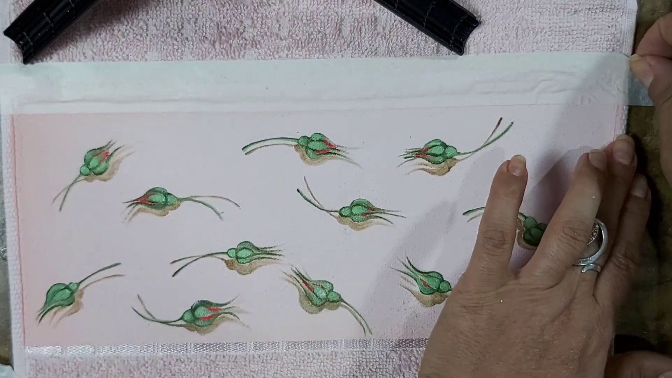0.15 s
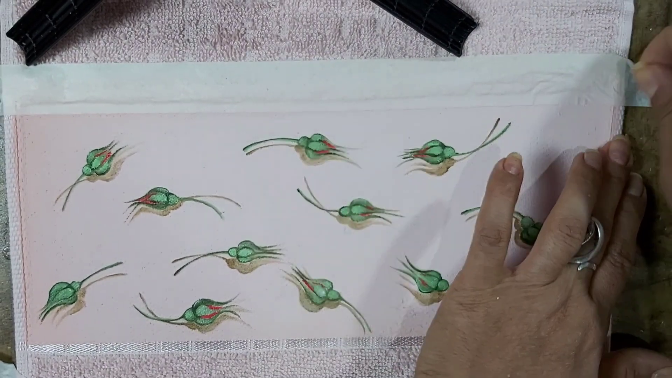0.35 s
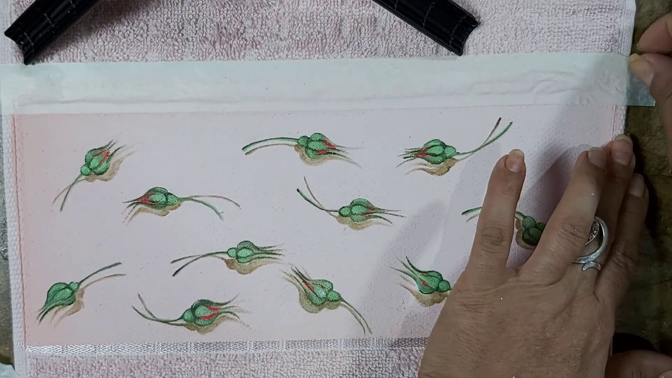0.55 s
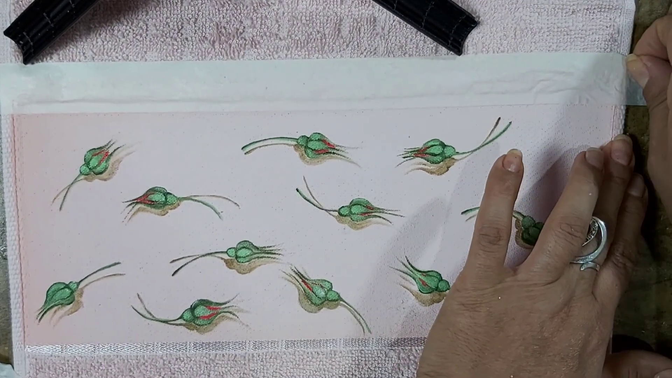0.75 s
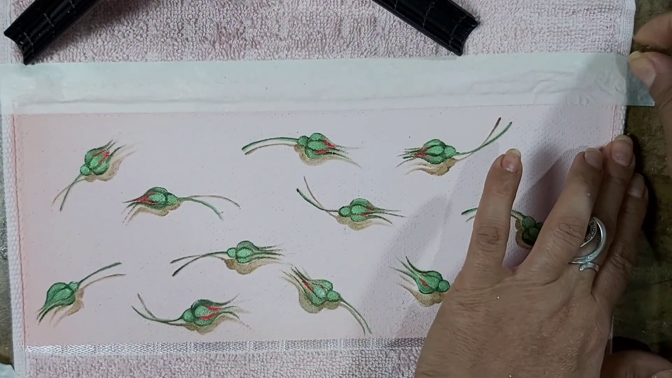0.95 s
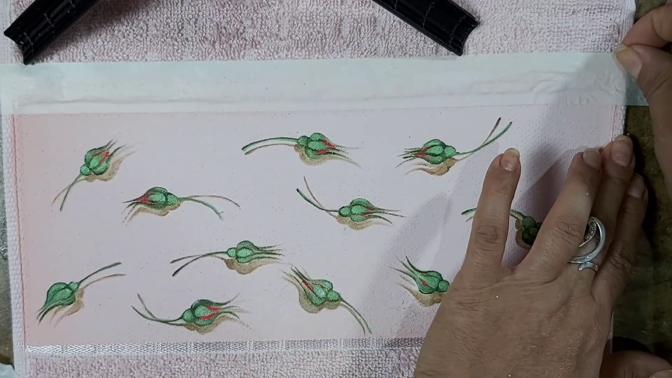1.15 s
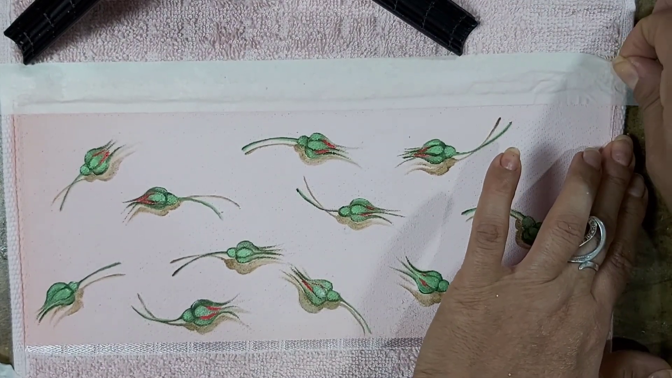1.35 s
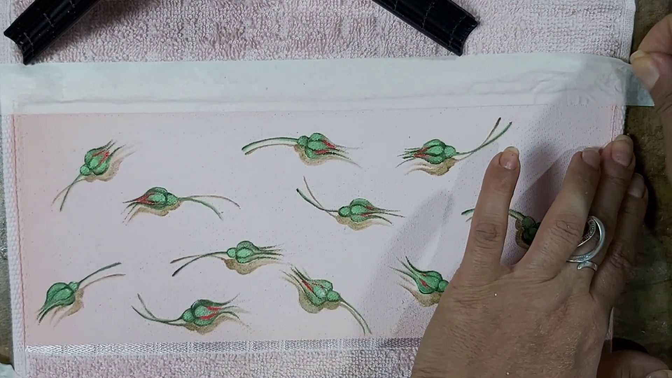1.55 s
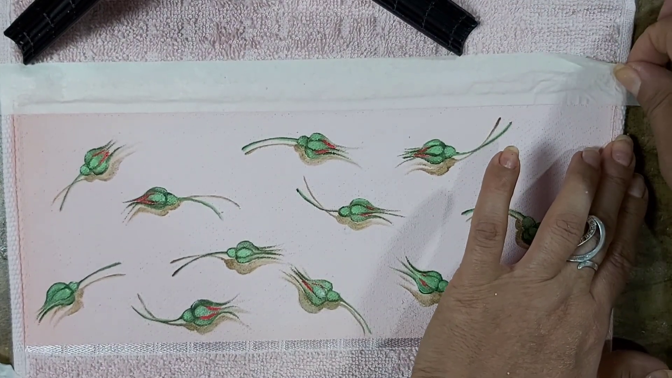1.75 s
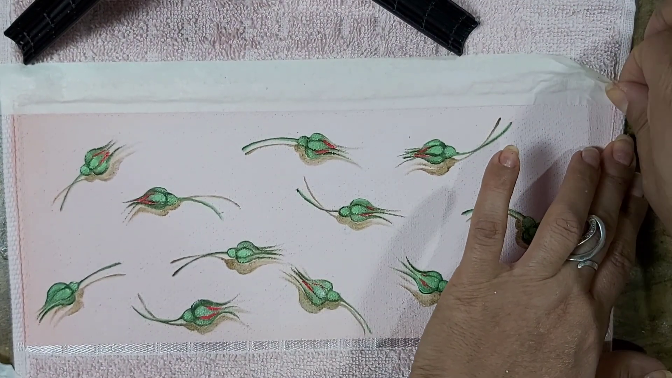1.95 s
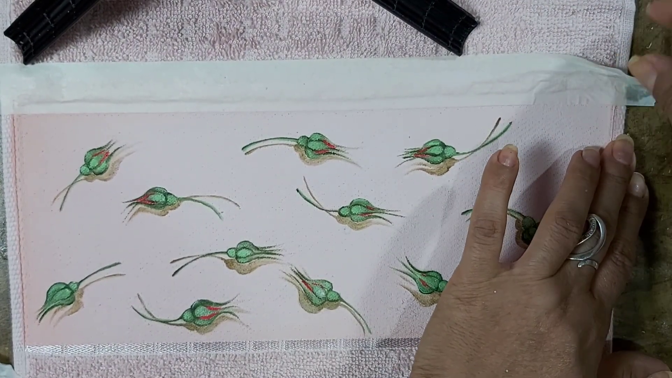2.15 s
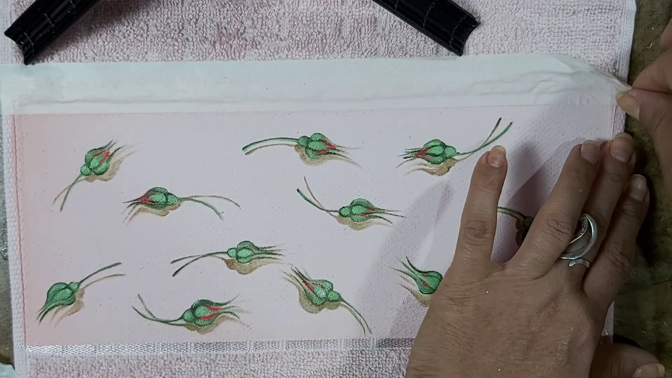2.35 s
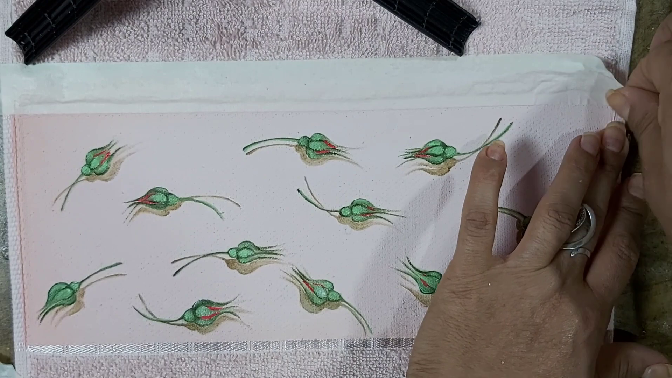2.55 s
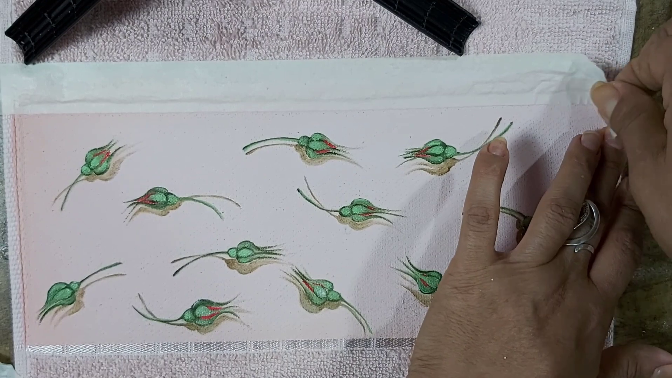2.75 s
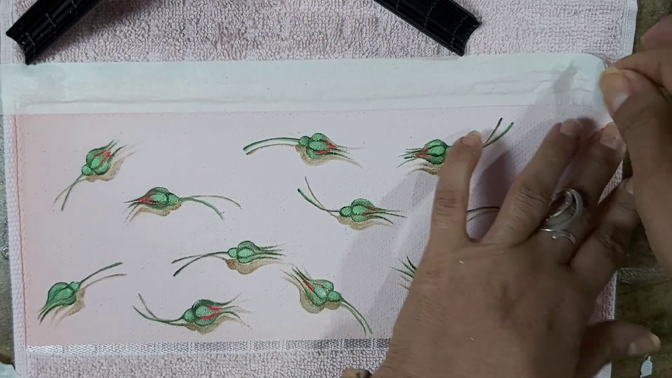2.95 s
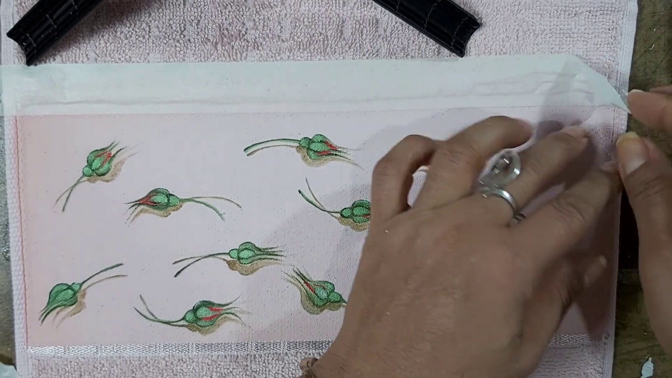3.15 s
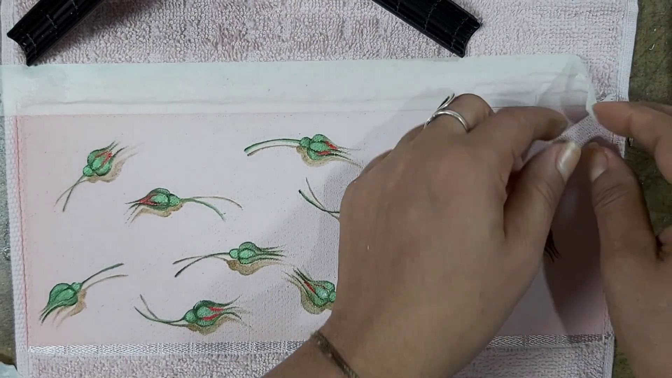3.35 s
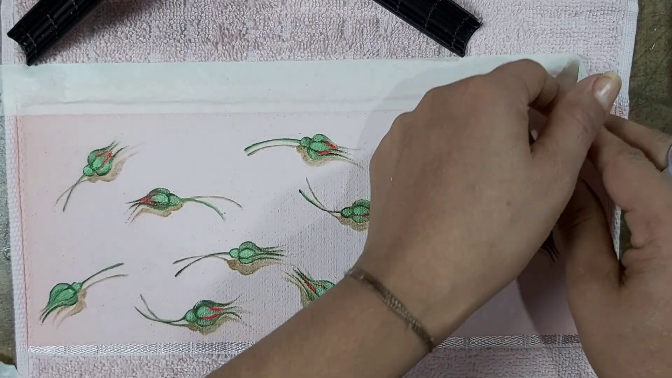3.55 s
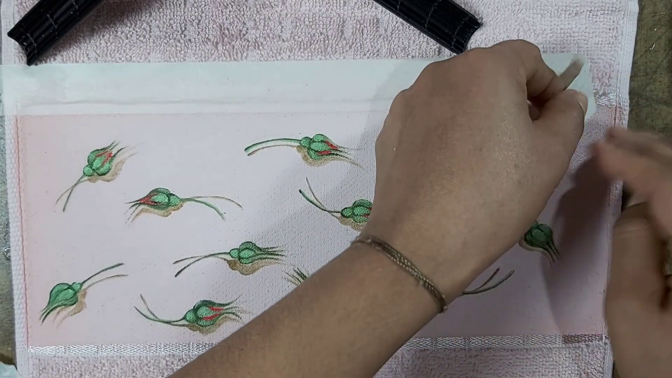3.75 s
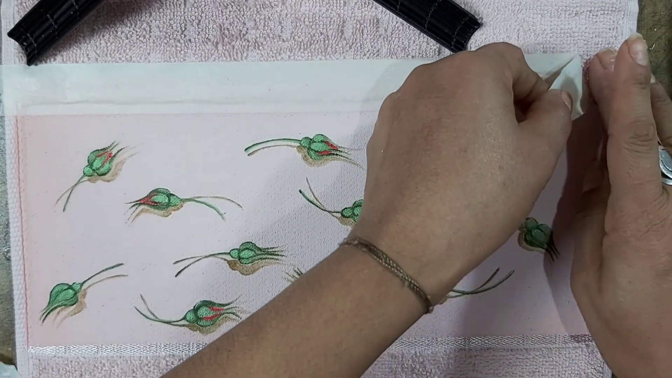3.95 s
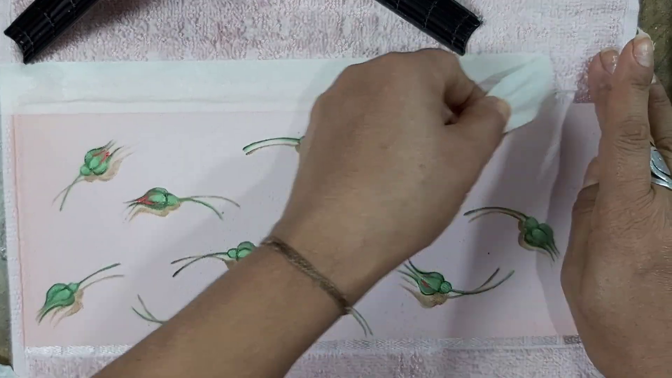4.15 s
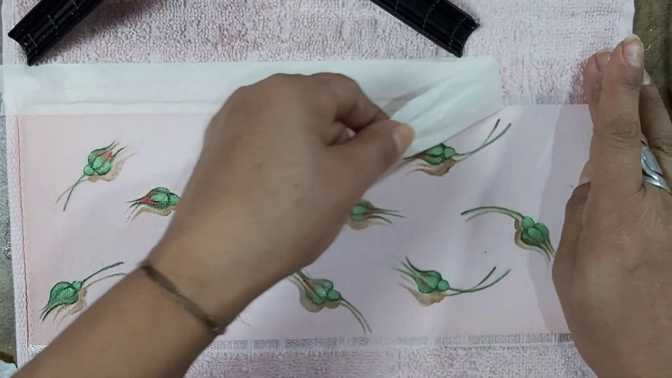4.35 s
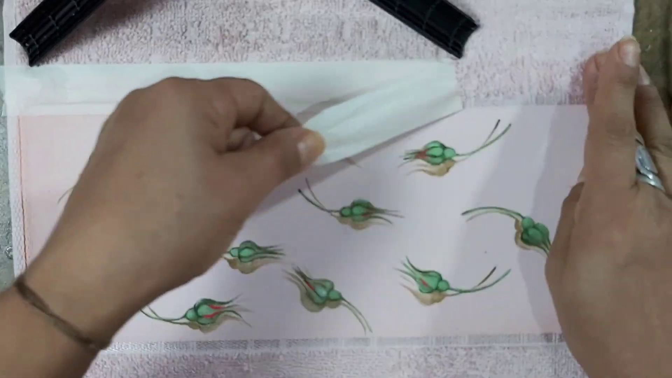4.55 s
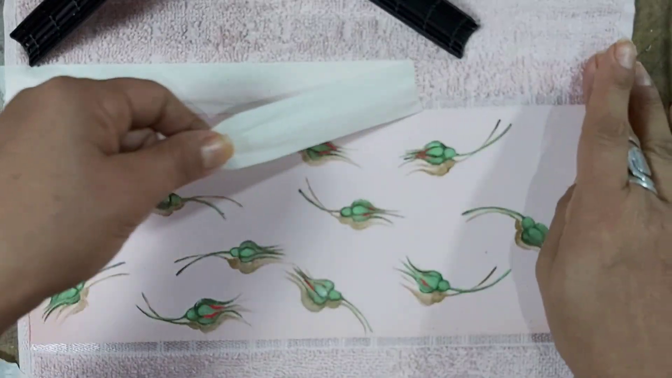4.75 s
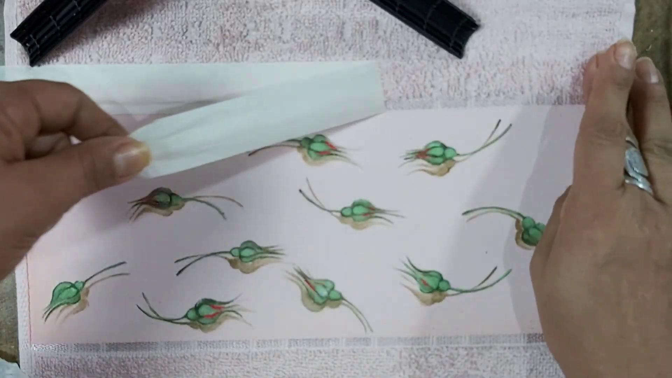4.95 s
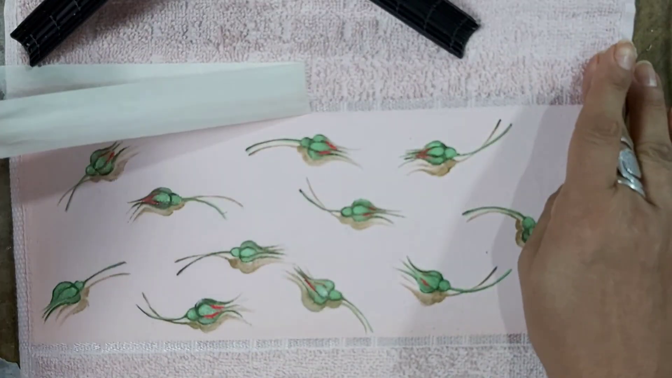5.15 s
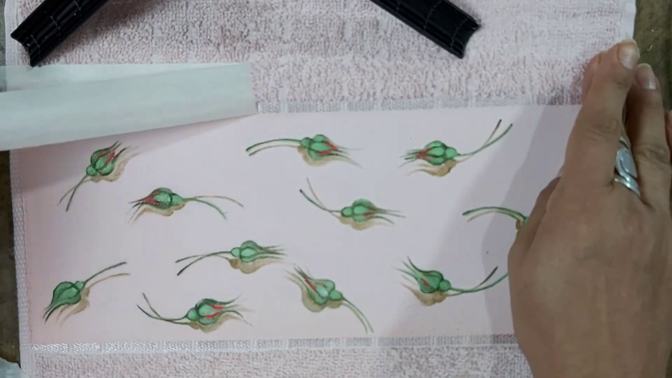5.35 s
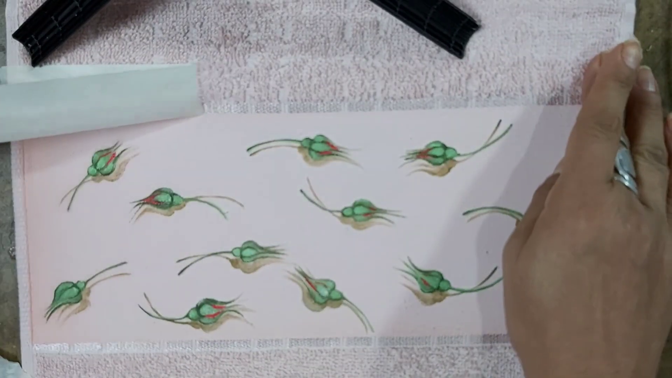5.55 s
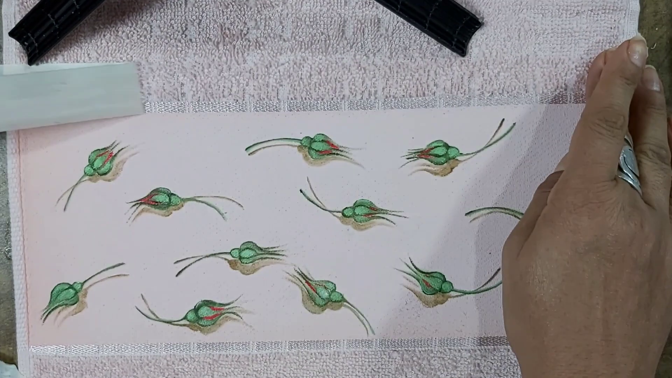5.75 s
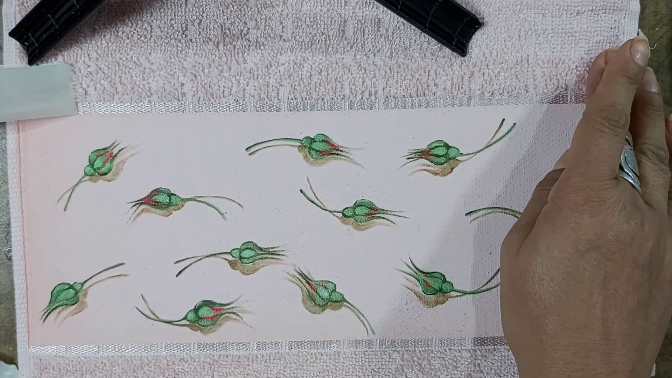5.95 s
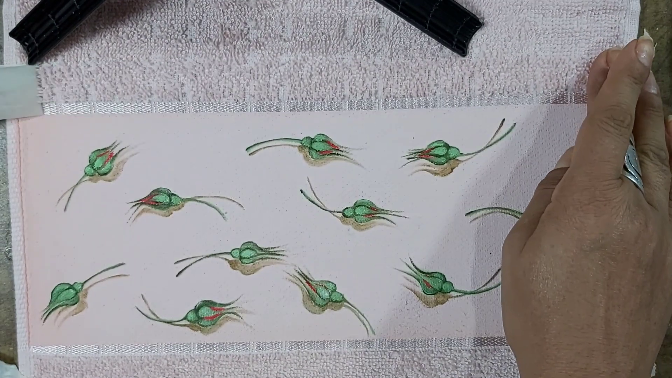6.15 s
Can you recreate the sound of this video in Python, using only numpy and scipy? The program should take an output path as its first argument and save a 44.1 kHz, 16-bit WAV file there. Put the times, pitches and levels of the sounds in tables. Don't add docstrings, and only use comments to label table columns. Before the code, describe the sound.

In a quiet room, adhesive tape crackles and snaps as a corner is lifted, then peels off fabric in a long, uneven tearing rasp.

```python
import sys
import numpy as np
from scipy import signal
from scipy.fft import rfft, irfft
from scipy.io import wavfile
from scipy.ndimage import uniform_filter1d, map_coordinates

SR = 44100
rng = np.random.default_rng(int(sys.argv[2]) if len(sys.argv) > 2 else 0)


def master(y):
    cut = np.clip(np.atleast_2d(y).T, -1, 1)
    pcm = np.round(cut * 32767)
    wavfile.write(sys.argv[1], SR, pcm.astype(np.int16))


def ratio_of_db(decibels):
    return 10 ** (np.asarray(decibels, float) / 20)


N = 272979

# time_s, left_lag_samples (delay of the left port behind the right)
PEEL_LINE = [
    (0, -11),
    (2.5, -10),
    (3.5, -10.5),
    (4.2, -4),
    (4.7, -2),
    (5.2, 2.5),
    (5.7, 5.5),
    (6.19, 5),
]


def peel():
    # time_s, finest_fibres_db (added)
    angle = [(1.9, 0), (2.3, 0), (2.45, -0.5), (2.7, 1), (3.2, 1), (3.5, -1), (3.9, 1), (4.07, -1),
             (4.36, 0.5), (4.42, -1), (5.08, 1), (5.44, -3), (5.6, -0.5), (5.69, 1.5), (6.19, 0)]
    # centre_hz, width_hz, level_db
    fibres = [(6360, 2350, -3.5), (7780, 1540, 2.5), (9260, 2090, -1.5)]
    # centre_hz, width_hz, level_db
    fine_fibres = [(11600, 1800, 1.5), (14120, 1020, -2)]
    # centre_hz, width_hz, level_db
    rustle = [(3110, 2520, -2), (4370, 670, 4.5), (5670, 2470, -2.5)]
    # centre_hz, width_hz, level_db
    strip = [(752, 49, 0), (1130, 490, 0), (1770, 400, 3.5), (2500, 950, -3)]
    # time_s, centre_hz, level_db (against the fibre clicks)
    span_ring = [
        (3.8, 11400, -16),
        (4.05, 8660, -16),
        (4.37, 11100, -6),
        (4.68, 9100, -12.5),
        (5.1, 11390, -8.5),
        (5.19, 9740, -16),
        (5.52, 8700, -13),
        (5.77, 10900, -6),
        (6.19, 9100, -11),
    ]

    click_db, fine_db, rustle_db, body_db, lean_db = pull()
    lag = curves(PEEL_LINE)[0]
    pan_db = -0.5 - 0.22 * lag + lean_db
    fine_db = fine_db + curves(angle)[0]
    rush_db = 0.74 * walk(60) + 0.66 * walk(25)
    threads = clicks(6000., 2.65)
    slips = clicks(2500., 1.32) + 0.19 * threads

    coarse_db = 10 * np.log10(np.clip(1 - ratio_of_db(2 * fine_db), .15, 1))
    coarse = steep(flex(threads, fibres, 1.27, 24), 4300, 11700)
    fine = steep(ring(threads, fine_fibres), 9060, 21300)
    paper = steep(flex(slips, rustle, 2.2, 40), 2610, 6840)
    body = steep(flex(slips, strip, 2.2, 30), 800, 3200)
    sound = level(coarse, 0) * ratio_of_db(coarse_db)
    sound += level(fine, 0) * ratio_of_db(fine_db + 1.7 * walk(40))
    sound += level(paper, 0) * ratio_of_db(rustle_db + 1.3 * walk(50))
    sound += level(body, 0) * ratio_of_db(body_db + 1.2 * walk(45))

    span_hz, span_db = curves([(3.7, 11600, -29.5)] + span_ring)
    span_width_hz = 1700
    sound += level(sweep(clicks(5000., 3.3), span_hz, span_width_hz), 0) * ratio_of_db(span_db)

    near, far = sound * ratio_of_db(click_db + rush_db - 2.0)
    far_lag = 158.7 + 30 * walk(4)
    return ports(near, pan_db, lag) + 1.18 * ports(far, pan_db, far_lag)


def pull():
    # peak_s, peak_db, rise_s, fall_s, weight (0 finest
    tugs = [(0.0, -79, .03, 0.067, 0.85), (0.098, -74, 0.12, 0.099, 0.58), (0.646, -78, .05, 0.11, 0.6),
            (0.976, -84.5, 0.15, 0.075, 0.75), (1.1, -84, 0.19, 0.056, 0.71), (1.252, -58, .13, 0.14, 0.28),
            (1.282, -57, 0.036, 0.16, 0.97), (1.6, -74.5, 0.28, 0.19, 0.24), (1.74, -49, 0.18, 0.16, 0.032),
            (1.8, -49, 0.19, 0.13, 0.29), (1.901, -59, 0.0087, 0.11, 0.78), (1.95, -75.5, .05, 0.13, 0.88),
            (2.3, -57, 0.088, 1.4, 0.077), (2.403, -43.5, 0.07, 0.19, 0.55),
            (2.463, -46.5, 0.21, 0.05, 0.54), (2.53, -55, 0.1, 0.21, 0.55), (2.6, -44, 0.089, 0.23, 0.63),
            (2.67, -50, 0.28, 0.037, 0.63), (2.76, -71, 0.34, 0.24, 0.39), (2.86, -63.5, 0.06, 0.15, 0.72),
            (3.25, -90, 0.3, 2.0, 0.9), (3.43, -64.5, 0.046, 0.41, 0.49), (3.507, -65, 0.013, 0.14, 0.91),
            (1.66, -64.5, .02, 0.27, 0.34), (2.24, -77.5, 0.47, 0.31, 0.74),
            (3.78, -63, 0.072, 0.61, 0.35), (3.881, -54.5, 0.18, 0.14, 0.46), (3.73, -96, .05, .1, 0.11),
             (3.95, -52, 0.034, 0.057, 0.2), (4.07, -46.5, 0.38, 0.4, 0.48), (4.192, -47, .01, 0.11, 0.5),
             (4.36, -43.5, 0.19, 0.054, 0.42), (5.08, -52, 0.19, .1, 0.28), (5.45, -44.5, 0.17, 0.1, 0.57),
             (5.57, -43.5, 0.13, 0.035, 0.45), (5.69, -45.5, 0.23, 0.047, 0.64), (5.97, -52, 1, 0.34, 0.12),
             (6.19, -48, 0.23, 0.11, 0.49)]
    # time_s, level_db, weight (0 to 1)
    steady = [
        (3.86, -84, 0.47),
        (3.932, -48, 0.5),
        (4.4, -47, 0.49),
        (4.72, -45.5, 0.49),
        (5.0, -42.5, 0.5),
        (5.44, -44, 0.47),
        (5.53, -47.5, 0.59),
        (6.04, -50.5, 0.58),
        (6.14, -58.5, 0.42),
    ]

    s, db, rise_s, fall_s, weight = np.transpose(tugs)
    power = swells(s, db, rise_s, fall_s)
    t = np.arange(power.shape[1]) / 1000
    at, rip_db, rip_weight = np.transpose(steady)
    power = np.vstack([power, ratio_of_db(2 * np.interp(t, at, rip_db, left=-120))])
    weight = np.vstack([weight[:, None] + 0 * t, np.interp(t, at, rip_weight)])
    click_db = summed_db(power)

    ranges = (-2, -6), (-15.5, -1.5), (-33, 6.5), (0, -4)
    shares = [click_db]
    for light, heavy in ranges:
        gain_db = light + (heavy - light) * weight
        shares.append(summed_db(power * ratio_of_db(2 * gain_db)) - click_db)
    return shares


def snaps():
    # time_s, peak_db, centre_hz, pan_db (left minus right)
    strong_threads = [(1.0664, -68, 4500, 2), (1.1372, -60, 10800, -0.5), (1.1714, -57, 11900, 3),
                      (1.2402, -48, 11600, 3), (1.2802, -34.5, 3450, 4), (1.535, -54, 10400, 7),
                      (1.587, -69, 11200, 3), (1.6024, -61.5, 13000, 8), (1.6112, -59, 13000, 1),
                      (1.645, -40, 12500, 3.0), (1.691, -35, 10350, 4), (1.743, -30, 11360, -1),
                      (1.8982, -41.5, 4530, 5), (2.232, -55, 7100, -10), (2.2854, -52, 11900, 4),
                      (2.2958, -63, 12100, 0), (2.3557, -35, 7550, -1), (2.398, -32, 4370, -4),
                      (2.4584, -29, 4220, 0), (2.585, -32.5, 4060, -2), (2.7432, -48, 11200, 2),
                      (2.8614, -40, 9190, 5), (3.423, -49.5, 12580, 22), (3.437, -44.5, 4560, 5),
                      (3.5033, -42, 4370, 10), (3.5682, -52, 12180, 8), (3.7031, -82, 13000, 3),
                      (3.7176, -64, 13800, -6), (3.7386, -61, 13000, 3), (3.7655, -60, 7430, 3),
                      (3.7773, -48, 13050, 15), (3.8181, -35, 11400, 12), (3.8613, -48, 5500, 4),
                      (3.9192, -44, 12500, 3), (3.947, -36, 8570, 9), (4.0612, -31, 7850, 13),
                      (4.154, -31, 9770, -8), (4.1856, -24.5, 10500, -4), (4.1875, -29, 6000, -7),
                      (4.346, -27, 12000, -13), (4.354, -35, 10880, 0), (4.37, -32, 10900, 4),
                      (4.9367, -28, 11100, -3), (5.041, -27, 12400, -15), (5.4544, -29, 8510, -8),
                      (5.4624, -31, 8270, -4.5), (5.536, -33, 8510, -5), (5.9309, -30, 8710, -4.5)]
    out, lag = np.zeros((2, N)), curves(PEEL_LINE)[0]
    t = np.arange(256) / SR
    for s, db, hz, pan_db in strong_threads:
        noise = rng.standard_normal(256)
        tick = (t == 0) + 0.16 * noise * np.exp(-t / 0.00067)
        tick = band(tick, hz, .5 * hz) + 0.51 * steep(tick, 0.54 * hz, 15500)
        tick *= ratio_of_db(db + 5) / np.max(np.abs(tick))
        i = int((s + 0.0014) * SR)
        out[0, i + int(lag[i]):][:256] += tick * ratio_of_db(pan_db / 2)
        out[1, i:i + 256] += tick * ratio_of_db(-pan_db / 2)
    return out


def knocks():
    # time_s, peak_db, edge_db (hard edge minus thud), drag_s (scrape length)
    fingers = [(0.439, -44.5, -30, 0.024), (0.558, -64, -32, 0.019), (0.84, -65, -32, 0.035),
               (1.142, -62, -18, 0.039), (1.275, -40, -9.5, 0.036), (1.32, -40.5, -22, 0.019),
               (1.487, -52.5, -16, 0.07), (1.514, -40.5, -24.5, 0.047), (1.893, -54.5, -9.5, 0.071),
               (2.102, -35, -21.5, 0.034), (2.146, -38, -26, 0.02), (2.386, -50.5, -19, 0.079),
               (2.607, -48.5, -29, 0.087), (2.857, -37.5, -3, 0.04), (2.913, -49, -4, 0.051),
               (3.497, -51.5, -9.5, 0.035)]
    # centre_hz, width_hz, level_db
    thud_modes = [(137.6, 36, -2.5), (180, 36, -1), (236, 38, 1), (310.5, 33, -4), (454, 84, -12.5)]
    # centre_hz, width_hz, level_db
    edge_modes = [(523, 140, -7), (805, 73, -1), (980, 63, 2.5), (1182, 110, 0), (1580, 620, -8)]

    soft, hard = np.zeros(N), np.zeros(N)
    t = np.arange(8192) / SR
    for s, db, edge_db, drag_s in fingers:
        drag = rng.standard_normal(8192) * np.exp(-t / np.clip(drag_s, .005, .1))
        i = int((s + 0.0029) * SR)
        soft[i:i + 8192] += (0.063 * drag + (t == 0)) * ratio_of_db(db)
        hard[i:i + 8192] += (0.051 * drag * np.exp(-t / 0.093) + (t == 0)) * ratio_of_db(db + edge_db)
    flesh = np.hanning(130) / 50
    thud = ring(np.convolve(soft, flesh)[:N], thud_modes)
    edge = band(ring(hard, edge_modes), 920, 1200)
    return ratio_of_db(41.5) * thud, ratio_of_db(36.5) * edge


def strain():
    # time_s, deepest_mode_hz, effort_db
    arm = [(0.0, 46.8, -65.5), (0.29, 45.5, -72.5), (0.43, 52.4, -64), (0.71, 47.3, -73), (1.1, 47.5, -66),
           (1.4, 49, -70), (1.6, 51.8, -65.5), (1.9, 48.1, -63.5), (2.65, 51.4, -60.5), (2.8, 52.1, -68.5),
           (3.0, 49.8, -61.5), (3.2, 49.97, -65), (3.75, 52.75, -67.5), (4.1, 53.94, -56),
           (4.6, 53.1, -56.5), (5.45, 52.3, -52), (5.67, 47.5, -49.5), (6.19, 41.3, -53.5)]
    # peak_s, deepest_mode_db, length_s, board_mode_db
    heaves = [(0.03, -76, 0.26, -67.5), (0.432, -76, 0.55, -75), (0.593, -80, 0.34, -65),
              (0.95, -68, 0.79, -65.5), (1.148, -75.5, 0.14, -65), (1.309, -69, 0.16, -66),
              (1.547, -70, 0.37, -60.5), (2.124, -62, 0.42, -65), (2.273, -81, 0.33, -59),
              (2.411, -74, 0.4, -61), (2.658, -69, 0.58, -57), (3, -52.5, 0.4, -62),
              (3.115, -53.5, 0.3, -58.5), (3.485, -56, 0.31, -64), (3.854, -58.5, 0.43, -66),
              (4.03, -71, 0.38, -52.5), (4.227, -44.5, 0.41, -56.5), (4.515, -57, 0.8, -55.5),
              (4.815, -49, 0.42, -53), (5.048, -47, 0.49, -52), (5.33, -48.5, 0.43, -57),
              (5.45, -41.5, 0.21, -60), (5.636, -41, 0.53, -52.5), (5.827, -52, 0.23, -44.5),
              (5.908, -47, 0.25, -44.5), (6.074, -50, 0.18, -43)]
    # peak_s, level_db, length_s
    drags = [(0.05, -85.5, 0.73), (0.602, -85, .6), (1.334, -57, 0.11), (1.45, -86, 0.67),
             (1.71, -82, 0.28), (2.207, -76, 0.24), (2.533, -76, .3), (2.897, -68, 0.3), (3.0, -88, 0.96),
             (3.532, -81, 0.27), (3.834, -86, 0.27), (4.073, -72, 0.52), (4.422, -66.5, 0.13),
             (4.639, -66.5, 0.33), (4.795, -61.5, 0.46), (5.054, -58, 0.52), (5.184, -61, 0.33),
             (5.443, -60.5, 0.25), (5.598, -62, 0.89), (5.783, -60.5, 0.24), (6.014, -62.5, 0.24),
             (6.08, -73, .2)]
    # centre_hz, width_hz, level_db
    table_modes = [(84.3, 17, 0.5), (111, 8.9, -8.5), (158, 14, -1.5), (223.4, 17, -3), (291.3, 21.6, -2.5)]

    deep_hz, upper_db = curves(arm)
    s, deep_db, length_s, board_db = np.transpose(heaves)
    deep_db = summed_db(swells(s, deep_db, length_s, length_s))
    board_db = summed_db(swells(s, board_db, length_s, length_s))
    s, drag_db, length_s = np.transpose(drags)
    drag_db = summed_db(swells(s, drag_db, length_s, length_s))

    phase = 2 * np.pi * np.cumsum(deep_hz * (1 + 0.0291 * walk(20.8))) / SR
    deep = (np.sin(phase) + 0.35 * np.sin(2 * phase)) * ratio_of_db(1.9 * walk(11))
    tremor = rng.standard_normal((6, N))
    board = band(band(tremor[:2], 130.3, 21.3), 130.4, 24)
    board = level(board, 0) * ratio_of_db(board_db)
    upper = steep(ring(tremor[2:4], table_modes), 64, 353)
    upper = level(upper, 0) * ratio_of_db(upper_db + 1.0 * walk(23) + 2.16 * walk(8))
    drag = level(steep(tremor[4:], 360, 749), 0) * ratio_of_db(drag_db + 6.9 * walk(10))

    wide = np.array([[1], [-1]])
    modes = board[0] + 0.22 * board[1] * wide + upper[0] + 0.35 * upper[1] * wide
    return level(deep, 0) * ratio_of_db(deep_db) + modes + drag


def room(x):
    hop, low_t60_s, high_t60_s = 8192, 0.23, 0.059
    t = np.arange(SR // 3) / SR
    out = np.zeros((2, N + 2 * hop + len(t)))
    x = np.pad(x, ((0, 0), (hop, 2 * hop)))
    for i in range(0, N + hop, hop):
        noise = rng.standard_normal((2, len(t)))
        low = signal.lfilter([.2], [1, -.8], noise)
        tail = low * ratio_of_db(-60 * t / low_t60_s) + (noise - low) * ratio_of_db(-60 * t / high_t60_s)
        tail *= np.clip(t / 0.0015, 0, 1) / np.sqrt(np.sum(tail ** 2) / 2)
        part = signal.fftconvolve(x[:, i:i + 2 * hop] * np.hanning(2 * hop), tail, axes=1)
        out[:, i:i + part.shape[1]] += part[:, :out.shape[1] - i]
    return out[:, hop:hop + N]


def hush():
    # frequency_hz, density_db (per Hz)
    spectrum = [(24, -26), (40, -14), (156, -5), (211, -8), (257, -16.5), (700, -32), (6500, -46.5),
                (14000, -41.5)]
    hz = np.fft.rfftfreq(N, 1 / SR) + 1
    at_hz, density_db = np.transpose(spectrum)
    shape = ratio_of_db(np.interp(np.log(hz), np.log(at_hz), density_db))
    mid, side = rfft(rng.standard_normal((2, N))) * shape
    both = mid + np.clip(hz / 600, 0, 1) * side * np.array([[1], [-1]])
    above = np.sqrt(np.mean(irfft(mid * (hz > 340), N) ** 2))
    return irfft(both, N) * ratio_of_db(-80) / above


def clicks(rate, spread_db):
    when = rng.random((2, N))
    sign = rng.standard_normal((2, N))
    size = rng.exponential(size=(2, N))
    return (when < rate / SR) * sign * ratio_of_db(spread_db * np.minimum(size, 5.))


def band(x, hz, width):
    return signal.lfilter(*signal.iirpeak(min(hz, .45 * SR), hz / width, fs=SR), x)


def ring(x, modes):
    return sum((-1) ** k * ratio_of_db(db) * band(x, hz, width) for k, (hz, width, db) in enumerate(modes))


def flex(x, modes, patchy_db, rate):
    out = 0
    for k, (hz, width, db) in enumerate(modes):
        out = out + (-1) ** k * ratio_of_db(db + patchy_db * walk(rate)) * band(x, hz, width)
    return out


def sweep(x, hz, width_hz):
    turn = np.exp(2j * np.pi * np.cumsum(hz) / SR)
    return np.real(signal.lfilter(*signal.butter(2, width_hz / SR), x / turn) * turn)


def steep(x, low_hz, high_hz):
    return signal.sosfilt(signal.butter(3, [low_hz, high_hz], "band", fs=SR, output="sos"), x)


def ports(x, pan_db, lag):
    left = map_coordinates(x, [np.arange(N) - lag], order=3, mode="nearest")
    return np.array([left * ratio_of_db(pan_db / 2), x * ratio_of_db(-pan_db / 2)])


def swells(s, db, rise_s, fall_s):
    fade_db, fade_curve = 36.5, 1.105
    late = np.arange(0, N / SR + .001, .001) - s[:, None]
    before_peak = -late / np.maximum(rise_s, .005)[:, None]
    after_peak = late / np.maximum(fall_s, .005)[:, None]
    gone = np.where(late < 0, before_peak, after_peak)
    return ratio_of_db(2 * (db[:, None] - fade_db * np.minimum(gone, 5) ** fade_curve))


def summed_db(power):
    total_db = 10 * np.log10(power.sum(axis=0) + 1e-12)
    return np.interp(np.arange(N) / SR, np.arange(power.shape[1]) / 1000, total_db)


def level(x, db):
    return x * ratio_of_db(db) / np.sqrt(np.mean(x ** 2))


def curves(table):
    s, *columns = np.transpose(np.vstack(table))
    return [np.interp(np.arange(N) / SR, s, c) for c in columns]


def walk(rate):
    k = int(SR / rate)
    held = np.repeat(rng.standard_normal(N // k + 1), k)
    return 0.904 * uniform_filter1d(held, k)[:N]


def scene():
    thud, edge = knocks()
    ticks = snaps()
    tape = peel() + np.array([np.roll(edge, -6), edge])
    table = (strain() + thud) * ratio_of_db(np.array([[-1.], [1.]]))
    walls = room(tape + ratio_of_db(-3.0) * ticks + ratio_of_db(-11.5) * thud)
    return tape + ticks + ratio_of_db(-1) * walls + table + hush()


def band_limit(x):
    return signal.sosfilt(signal.butter(12, 16100, fs=SR, output="sos"), x)


def record(dry):
    # centre_hz, width_hz, level_db
    left_port = [(314, 220, -3), (820, 610, 1), (4460, 2000, 2.5), (8260, 3000, -3.4)]
    # frequency_hz, threshold_db (under the treble)
    mask = [(330, -60), (400, -22), (750, -19), (1000, -18), (3300, -8), (4300, -5.5), (5500, -8),
            (6500, -40)]
    # start_s, end_s, low_hz, high_hz
    starved = [(1.32, 1.38, 10400, 11200), (1.65, 1.88, 2950, 3400), (1.68, 1.83, 1850, 2200),
               (1.71, 1.81, 850, 1250), (1.75, 1.81, 550, 850), (1.8, 1.87, 1250, 1500),
               (2.25, 2.35, 3400, 3700), (2.3, 2.355, 2100, 3200), (2.88, 2.99, 5450, 5700),
               (2.88, 2.99, 5950, 6200), (2.35, 2.44, 520, 760), (2.6, 2.68, 480, 720),
               (4.22, 4.29, 560, 800), (4.27, 4.36, 430, 640), (4.46, 4.56, 450, 620),
               (4.54, 4.65, 530, 680), (3.85, 3.88, 430, 900), (3.93, 4.03, 430, 580),
               (4.03, 4.14, 560, 760), (4.27, 4.41, 2900, 3150), (4.35, 4.45, 3550, 3850),
               (5.08, 5.2, 520, 660), (5.2, 5.3, 600, 800), (5.3, 5.37, 450, 600), (5.5, 5.53, 3500, 3800),
               (4.72, 4.76, 4450, 5100), (5.73, 5.77, 4700, 5100), (5.8, 5.885, 3750, 4150),
               (5.93, 6.09, 3850, 4200), (6.07, 6.12, 3450, 3650), (6.13, 6.165, 3750, 4150),
               (5.89, 5.95, 540, 720), (6.13, 6.19, 560, 780)]
    sharp_s = [1.281, 1.645, 1.899, 3.424, 3.505, 3.82, 4.187]
    top_hz = 14650

    left = dry[0]
    for hz, width, db in left_port:
        left = left + (ratio_of_db(db) - 1) * band(left, hz, width)
    dry = np.array([left, dry[1]])

    hz, s, frames = signal.stft(dry, SR, nperseg=2048)
    power = np.mean(np.abs(frames) ** 2, axis=0)
    treble = power[(hz > 6000) & (hz < 14000)].mean(axis=0)
    masker = treble * np.maximum(treble / treble.max(), 1e-6) ** 0.32
    limit = masker * ratio_of_db(2 * np.interp(hz, *np.transpose(mask)))[:, None]
    whim = uniform_filter1d(rng.standard_normal((len(hz) // 6 + 1, len(treble))), size=3)
    limit = limit * ratio_of_db(9 * np.repeat(whim, 6, axis=0)[:len(hz)])
    heard = uniform_filter1d(power, size=5, axis=0) > limit
    heard &= (hz < top_hz)[:, None]
    for start, end, low, high in starved:
        in_band = ((hz > low) & (hz < high))[:, None]
        heard &= ~(in_band & (s > start) & (s < end + .012))
    kept = signal.istft(frames * heard, SR, nperseg=2048)[1][:, :N]

    is_open = sum(np.abs(np.arange(N) / SR - at) < .002 for at in sharp_s)
    mix = kept + .4 * steep(dry, top_hz, 15900) * uniform_filter1d(1. * is_open, size=40)
    return band_limit(mix)


dry = scene()
out = record(dry)
master(out)
```